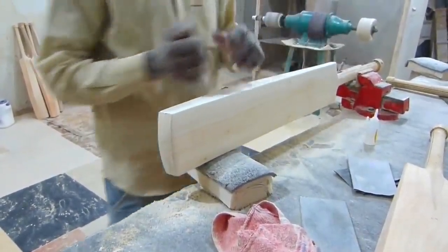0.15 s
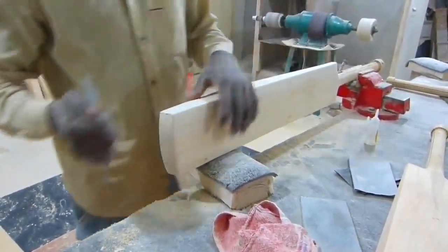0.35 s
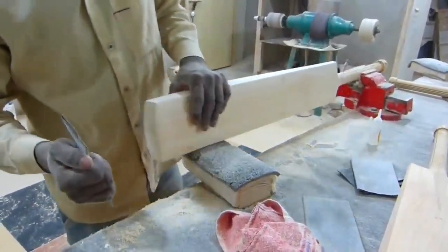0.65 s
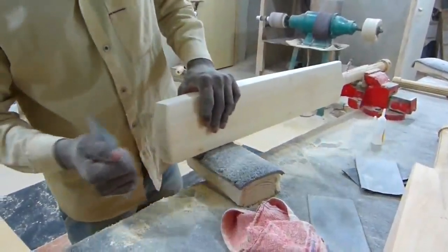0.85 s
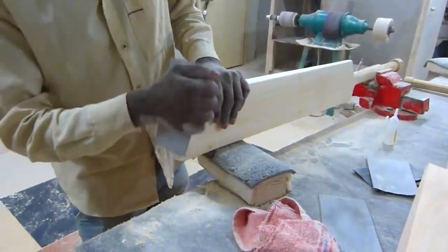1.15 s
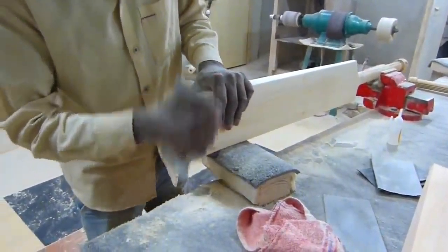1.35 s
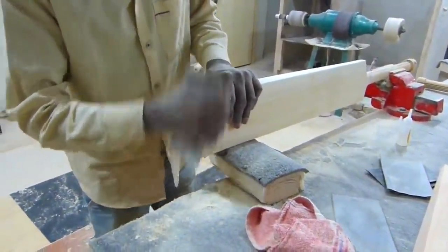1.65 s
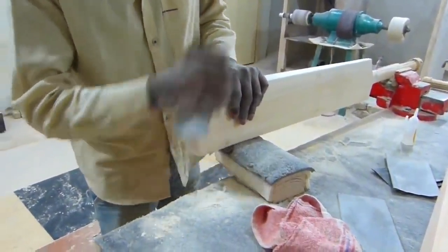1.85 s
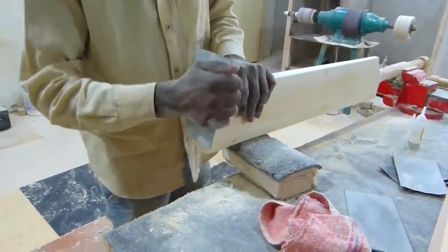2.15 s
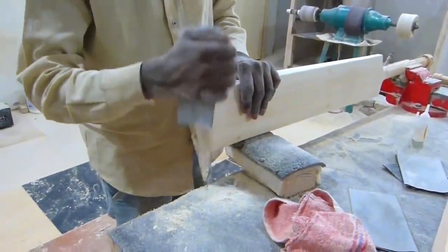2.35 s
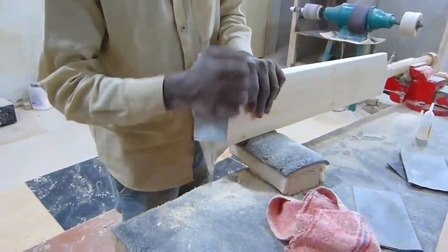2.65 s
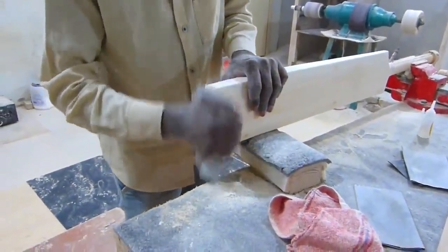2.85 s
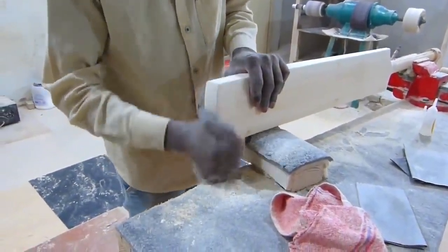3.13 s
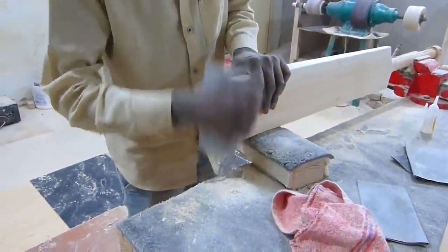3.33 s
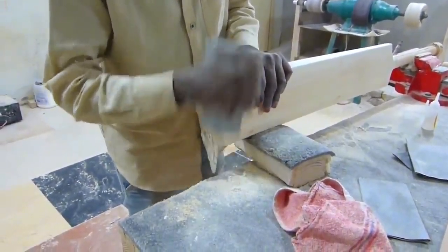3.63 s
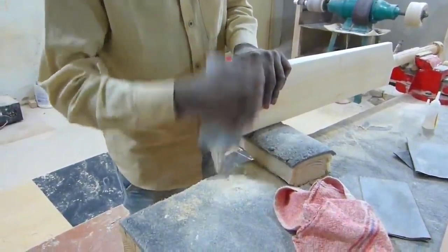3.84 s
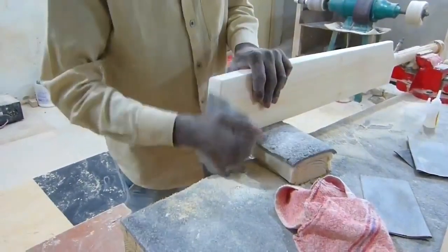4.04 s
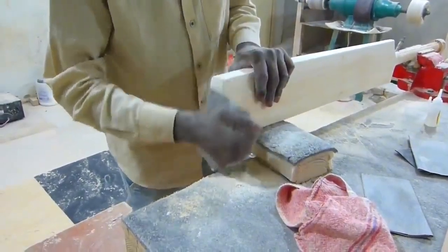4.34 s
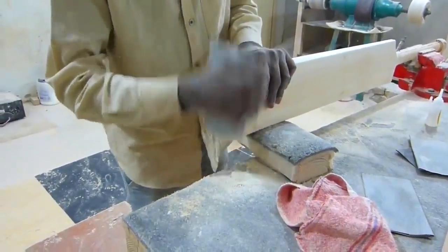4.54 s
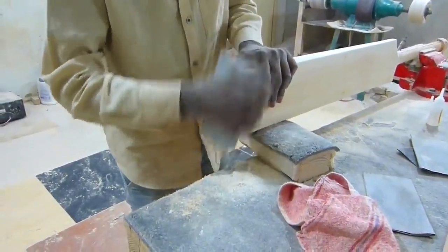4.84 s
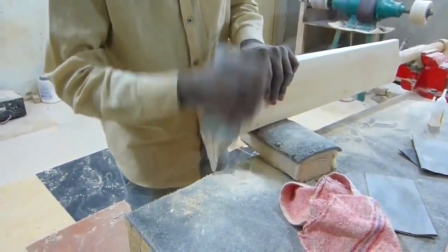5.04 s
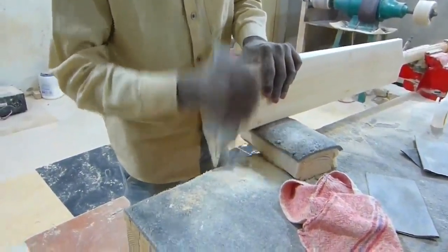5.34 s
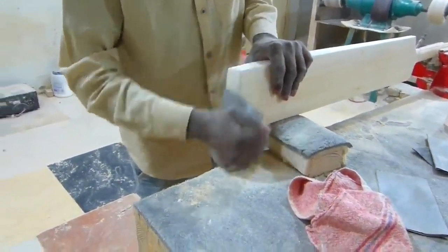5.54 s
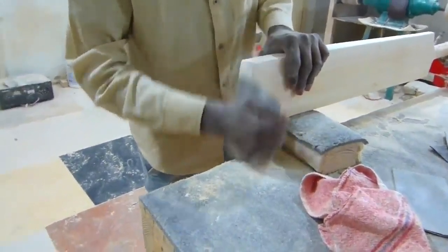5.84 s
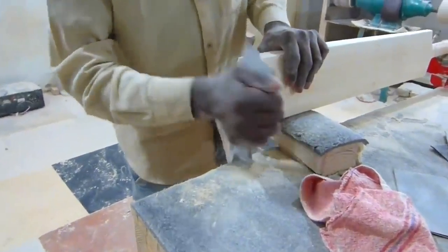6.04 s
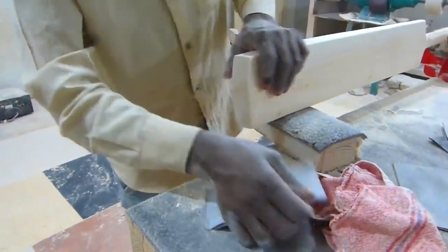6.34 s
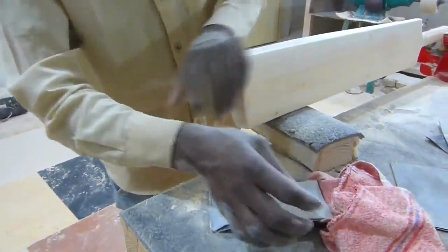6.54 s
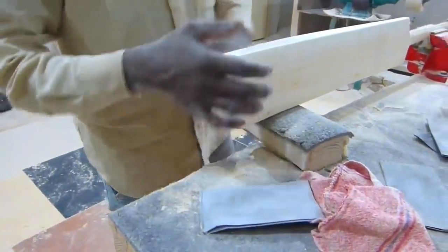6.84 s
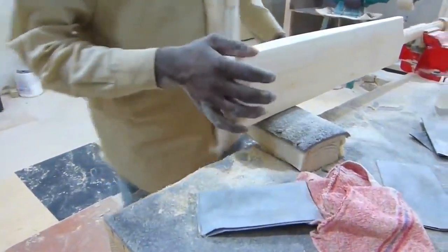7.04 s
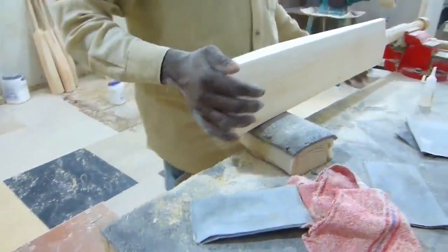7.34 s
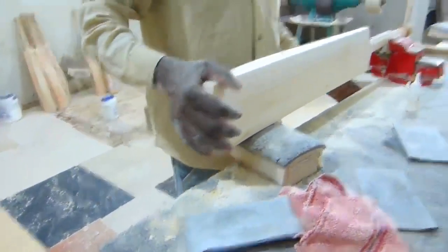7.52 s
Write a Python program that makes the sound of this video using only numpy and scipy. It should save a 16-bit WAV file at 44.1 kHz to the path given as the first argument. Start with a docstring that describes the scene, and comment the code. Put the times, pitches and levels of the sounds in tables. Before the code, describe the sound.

Sandpaper scrapes briskly back and forth over a wooden blade, bright and gritty, with later wooden knocks in a bare room and faint machine hum.

```python
"""Sandpaper is rubbed to and fro, about five strokes a second, over the end of a wooden blade in a bare workshop.
The hiss is a dense crackle of tiny random clicks, louder and brighter as the hand moves faster.
Short sprays of snaps are the paper snagging on the edge; a soft rumble is the wood under the pad.
Wood knocks, most of them late, are noise bursts with ringing tones and an echo of the room.
A machine hums faintly behind, over room noise. The sound cuts in after about half a second of silence."""
import sys
import numpy as np
from scipy import signal
from scipy.fft import rfft, irfft
from scipy.io import wavfile
from scipy.ndimage import uniform_filter1d

SR = 44100
rng = np.random.default_rng(int(sys.argv[2]) if len(sys.argv) > 2 else 0)


def generate_wav(signal):
    """Clip the signal to [-1, 1] and save it as 16-bit WAV at the path in sys.argv[1]."""
    frames = np.transpose(np.atleast_2d(signal))
    scaled = np.clip(frames, -1, 1) * 32767
    pcm = np.round(scaled).astype(np.int16)
    wavfile.write(sys.argv[1], SR, pcm)


N = 338688   # length in samples
TIME = np.arange(N) / SR   # seconds


# Strokes of the hand, with a near-silent pause at 3.82 s; the last row only ends the one before.
# Sheen is the extra treble.
# Columns: turn_s, level_db, sheen_db
HAND_STROKES = [(0.468, -29.5, 4), (0.662, -26, 0), (0.83, -26, 1), (0.958, -28, 2), (1.11, -26, 3),
                (1.27, -27.5, -0.5), (1.43, -27.5, 2), (1.598, -26.5, 0), (1.728, -28, -2),
                (1.869, -28, -3), (2.031, -27.5, -3), (2.166, -27.5, 0), (2.311, -29.5, -2),
                (2.48, -27.5, -0.5), (2.638, -28, 2.5), (2.92, -26.5, 0.5), (3.1, -28.5, 3),
                (3.4, -31, 1.5), (3.582, -28.5, 2), (3.821, -47.5, -9), (3.99, -35, 2), (4.189, -30, 2),
                (4.379, -32, 3.5), (4.585, -33.5, 3.5), (4.786, -33, 6), (5.019, -31, -0.5),
                (5.21, -31.5, 0), (5.423, -29.5, -9), (5.593, -31, 3.5), (5.77, -33, -11), (5.944, -33, -3),
                (6.11, -26.5, -5), (6.33, -33.5, 0.5), (6.508, -28.5, -2), (6.745, -31.5, 3.5),
                (6.92, -27, -3), (7.119, -30, 2), (7.301, -27, 1), (7.49, -32, 0), (7.67, -24.5, 0),
                (7.85, -36, 0)]


def hand_motion(speed_up_s=0.035, slow_down_s=0.065, arc=0.24):
    """The hand gathers speed after a turn and brakes before the next; returns stroke number and speed 0-1."""
    turn_s = np.transpose(HAND_STROKES)[0]
    place = np.interp(TIME, turn_s, np.arange(len(turn_s)))
    stroke = place.astype(int)
    since_s = np.maximum(TIME - turn_s[stroke], 0)
    until_s = turn_s[stroke + 1] - TIME
    # a share `arc` of the speed swells and ebbs over the whole stroke
    swell = 1 - arc + arc * np.sin(np.pi * (place - stroke))
    speed = np.tanh(since_s / speed_up_s) * np.tanh(until_s / slow_down_s) * swell
    return stroke, speed


# Colour of grit on wood.
# Columns: pitch_hz, level_db (per Hz)
GRIT_COLOUR = [(820, -22), (1400, -6), (1520, -5.5), (1870, -4.5), (2270, -3), (2560, -0.5), (2830, 0.5),
               (3630, 3), (8610, 6), (11200, 3.5), (14100, -6.5), (15400, -12.5)]
# Level of the low rasp (full below 3.6 kHz, gone above 5.5 kHz) against the hiss above it.
# Columns: time_s, level_db
RASP_LEVEL = [(0.5, -1.5), (1.5, -1.5), (2.4, 0.5), (3.5, -2), (4.3, -6), (5.0, 3.5), (5.5, -4),
              (6.2, -3.5), (7.68, -3)]


def sanding(stroke, speed, chatter_db=1.06, brighten_db=4.5, wander_db=2.5, grip=0.58,
            wash_db=-2, wash_t60_s=0.48, wash_dull_db=4):
    """Grit tears fibres: a dense crackle that grows louder and brighter with speed."""
    _, peak_db, top_db = np.transpose(HAND_STROKES)
    rasp_db = in_time(RASP_LEVEL)
    force = from_db(peak_db[stroke]) * speed ** grip
    # faster means more grains; the division keeps their overall level even
    crackle = grains(26000 * (speed + .3), size_db=2.1) / np.sqrt(speed + .3)
    hiss = spread(crackle, GRIT_COLOUR)
    hz, whole = np.fft.rfftfreq(N, 1 / SR), rfft(hiss)
    coloured = 0
    centres_hz = np.linspace(1500, 13500, num=22)
    for k, centre in enumerate(centres_hz):
        # each band of the hiss wanders at random in level
        share = np.interp(hz, centres_hz, np.arange(len(centres_hz)) == k)
        rasp = np.interp(centre, [3600, 5500], [1, 0]) * rasp_db
        brightness_db = top_db[stroke] + brighten_db * (speed - .86)
        sheen = np.interp(centre, [8600, 12400], [0, 1]) * brightness_db
        coloured = coloured + irfft(whole * share, N) * from_db(rasp + sheen + wander_db * drift(24))
    rub = coloured * force * from_db(chatter_db * drift(100))
    # a smooth, duller wash of the hiss lingers in the room
    duller = [(f, db - np.interp(f, [7000, 14000], [0, wash_dull_db])) for f, db in GRIT_COLOUR]
    wash = spread(rng.standard_normal((2, N)), duller) * from_db(wash_db)
    return rub + wash * lingering(force, wash_t60_s)


def lingering(gain, t60_s):
    """A room stores sound energy and loses 60 dB in t60_s: the echo level left by a changing gain."""
    keep = from_db(-60 / (t60_s * SR)) ** 2
    return np.sqrt(signal.lfilter([1 - keep], [1, -keep], gain ** 2))


def off_the_blade(x, stroke, speed, path_s=0.0016, bounce=0.073):
    """A reflection whose path follows the hand up and down ripples the spectrum."""
    travel = np.cumsum(speed * (-1.) ** stroke) / SR
    height = rms_one(travel - uniform_filter1d(travel, SR))   # without the slow drift
    heard_s = TIME - path_s * (1 + 0.056 * height)
    reflected = np.array([np.interp(heard_s, TIME, side) for side in x])
    return (x + bounce * reflected) / np.hypot(1, bounce)


# The paper snags on the edge; tilt is the treble gain from one band to the next.
# Columns: start_s, level_db, tilt_db, length_s
EDGE_SNAGS = [(0.588, -19.5, 6, 0.0086), (0.693, -28, -1, 0.02), (0.919, -25, -6, 0.0035),
              (1.2326, -23.5, 1.5, 0.018), (1.2398, -21, 0.5, 0.015), (1.2666, -28.5, -7, 0.022),
              (1.521, -22, 7.5, .006), (2.183, -26, -1, 0.013), (2.408, -21.5, 5.5, .012),
              (2.465, -28.5, -3.5, 0.03), (2.727, -27, 7.5, 0.015), (2.801, -28, -1, 0.011),
              (3.03, -23, 5, .014), (3.358, -24.5, 5.5, 0.0124), (3.467, -27.5, 1.5, 0.019),
              (5.173, -39, -7, 0.0134), (7.17, -24.5, -0.5, 0.0043)]
# The bands that make up each snag.
# Columns: low_hz, high_hz, level_db
SNAG_COLOUR = [(700, 1090, -9.5), (1850, 3180, 1), (4040, 6600, -3.0)]


def snags(room_db=-11.5, room_t60_s=0.52, catch=14.6, catch_s=0.011, rise=0.2, spray=1.22, uneven_db=3.0):
    """The paper catches and lets go in a short spray of snaps, with a little echo."""
    out, t = np.zeros((2, N)), TIME[:SR // 3]
    for start_s, level_db, tilt_db, length_s in EDGE_SNAGS:
        colour = uneven_colour(uneven_db)
        snaps = spread(grains(4500, size_db=2.4, size=len(t)), colour)
        age = t / max(length_s, .002)   # in snag lengths
        echo = spread(rng.standard_normal((2, len(t)))) * from_db(room_db - 60 * t / room_t60_s)
        burst = (spray * snaps * np.exp(-age) + echo) * (1 - np.exp(-age / rise))
        # a brief snag is mostly one snap
        burst[:, np.argmax(age >= rise)] += catch * np.exp(-length_s / catch_s)
        for k, (low, high, band_db) in enumerate(SNAG_COLOUR):
            gain = from_db(level_db + band_db + tilt_db * (k - 1))
            add(out, start_s, even_band(burst, low, high) * gain)
    return out


# How hard the pad bears on the blade, as rumble level before rumble_db and the speed are applied.
# Columns: time_s, level_db
PAD_PRESSURE = [(0.62, -39.5), (1.34, -40), (3.45, -44), (3.66, -56), (4.01, -45.5), (4.44, -59.5),
                (4.6, -46), (5.1, -52.5)]
# Colour of the rumbling blade.
# Columns: pitch_hz, level_db (per Hz)
BLADE_COLOUR = [(53, -41), (90, -27), (118, 6), (158, -2.5), (239, 4), (277, -7.5), (338, 2), (454, -4.5),
                (593, 4.5), (840, -6), (1170, -0.5), (1620, -7.5), (2200, -5.5), (2860, -13), (4840, -120)]


def blade(speed, rumble_db=5.0):
    """The wood gives a soft rumble as hard as the pad bears on it, a little stronger with speed."""
    rumble = spread(grains(9000, size_db=2.0), BLADE_COLOUR)
    return rumble * from_db(in_time(PAD_PRESSURE) + rumble_db) * (0.61 + 0.069 * speed)


# Knocks of wood; tilt is the hardness as gain from one band to the next, ring level is against the blow.
# Columns: start_s, blow_db, tilt_db, ring_hz, ring_db, rattle_s
WOOD_KNOCKS = [(0.592, -38.5, -4, 240.7, 2.5, 0.026), (0.905, -31.5, 3, 655, -7, 0.0044),
               (5.17, -32.5, 4.5, 2900, -3.5, 0.035), (5.226, -33.5, 4.5, 645, -3.5, 0.0077),
               (5.51, -36.5, -12, 322.4, 5, 0.04), (5.636, -42.5, -14.5, 306.6, 0, 0.0036),
               (5.806, -24, 0.5, 880, -3, 0.0045), (5.849, -20, -5, 686, -19, 0.00078),
               (6.012, -17.5, 2.5, 189.5, 3.5, 0.005), (6.03, -26, -8.5, 199.8, 1.5, 0.012),
               (6.315, -28.5, 0.5, 303, -1, .005), (6.342, -24.5, 2, 190, -4, 0.0037),
               (6.371, -13.5, 2, 189, -2, 0.0035), (6.511, -21, -2, 186, -7, 0.0067),
               (6.95, -28, -0.5, 195, -5.5, .003), (7.171, -32.5, -8, 330, -1.5, 0.0056),
               (7.541, -41.5, -7, 209, 2, 0.038)]
# Bands of a knock; echo_t60_s is the time the echo takes to fall 60 dB.
# Columns: low_hz, high_hz, share_of_blow_db, direct_db, echo_db, echo_t60_s
BLOW_BANDS = [(114, 320, -3, -5.5, -9, 1), (335, 770, 2, -6, -10.5, 0.96), (880, 1540, -7.5, 3.5, -7.0, 1),
              (1840, 3400, -9, 1.5, -17.5, 1)]
# Ringing modes of the struck wood, before shared_db and small random changes.
# Columns: pitch_hz, level_db, t60_s
WOOD_MODES = [(130.5, -10.5, 0.89), (319, -18, 0.26), (492, -17, 0.52), (647, 0, 0.062), (803, -14.5, 0.26),
              (886, -4.5, 0.91), (1165, -8, 0.58), (1540, -26, 0.25), (1935, -16, 0.65), (2900, -18, 0.15)]


def knocks(impact=9.0, spread_s=0.0013, soft_s=0.00051, shared_db=-3.0, main_t60_s=0.66, uneven_db=3.5):
    """Each blow is one hard impact and a brief rattle; it sets the wood ringing and fills the hard-walled room."""
    out, t = np.zeros((2, N)), TIME[:SR]
    tops_hz = [row[1] for row in BLOW_BANDS]
    contact = 1 - np.exp(-(t / soft_s) ** 2)
    # the common modes, which every blow excites
    shared_modes = [(hz, db + shared_db, t60_s) for hz, db, t60_s in WOOD_MODES]
    for start_s, blow_db, tilt_db, own_hz, own_db, rattle_s in WOOD_KNOCKS:
        levels_db = [blow_db + row[2] + tilt_db * (k - 1) for k, row in enumerate(BLOW_BANDS)]
        rattle_s = max(rattle_s, .001)
        colour = uneven_colour(uneven_db)
        for (low, high, _, direct_db, echo_db, t60_s), level_db in zip(BLOW_BANDS, levels_db):
            direct = from_db(direct_db) * np.exp(-t / rattle_s) * contact
            echo = from_db(echo_db - 60 * t / t60_s) * (1 - np.exp(-t / spread_s))
            blow = spread(rng.standard_normal((2, len(t))), colour) * (direct + echo)
            # the shorter the rattle, the harder the impact
            blow[:, 0] += 2 * impact * np.exp(-rattle_s / 0.0031)
            add(out, start_s, even_band(blow, low, high, order=3) * from_db(level_db))
        # one more ring depends on where the blow lands
        for hz, db, t60_s in shared_modes + [(own_hz, own_db, main_t60_s)]:
            level_db = db + levels_db[min(np.searchsorted(tops_hz, hz), len(tops_hz) - 1)]
            phase = 2 * np.pi * hz * (1 + 0.0106 * rng.standard_normal()) * t
            # a close neighbour makes each ring waver
            ring = 0.99 * np.sin(phase) + 0.39 * np.sin(1.07 * phase)
            fade = from_db(level_db + rng.normal(0, 1.8) - 60 * t / t60_s)
            add(out, start_s, (ring * contact * fade)[None])
    return band(out, 112, 12000)


# Tones of the machine, before machine_db and the wavering are applied.
# Columns: pitch_hz, level_db
MACHINE_TONES = [(80.7, -59), (107.7, -62), (306.8, -64), (409.1, -62), (651.4, -62), (1314, -64)]
# Colour of the room noise.
# Columns: pitch_hz, level_db (per Hz)
ROOM_COLOUR = [(24, -40), (40, -10), (71, -8), (249, -10), (336, -10.5), (512, -5.5), (1000, -11),
               (1270, -14.5), (1740, -8), (2060, -13), (2200, -13.5), (2860, -18), (4840, -120)]


def workshop(machine_db=-1.5, room_db=-46.5):
    """A far machine hums and wavers over the noise of the room; both come forward before halfway."""
    hum = 0
    for hz, db in MACHINE_TONES:
        tone = np.sin(2 * np.pi * hz * TIME + drift(8))
        waver = from_db(2 * drift(5)) * tone
        hum = hum + np.sqrt(2) * from_db(db + machine_db) * waver
    noise = from_db(room_db) * spread(rng.standard_normal((2, N)), ROOM_COLOUR)
    return (hum + noise) * np.interp(TIME, [2.6, 3.8], [.55, 1])


def from_db(db):
    """Decibels to gain."""
    return 10 ** (np.asarray(db) / 20)


def rms_one(x):
    """Scale to an average strength (rms) of 1."""
    return x / np.sqrt(np.mean(x ** 2) + 1e-20)


def in_time(rows):
    """Read a curve of time_s, value rows at every sample."""
    return np.interp(TIME, *np.transpose(rows))


def at_hz(points, hz):
    """Read a table of pitch_hz, value rows on a log-frequency axis."""
    f, value = np.transpose(points)
    return np.interp(np.log(hz + 1e-3), np.log(f), value)


def band(x, low_hz, high_hz, order=2):
    """Keep only the sound between two frequencies."""
    edges_hz = [low_hz, min(high_hz, SR / 2 - 100)]
    return signal.sosfilt(signal.butter(order, edges_hz, "band", fs=SR, output="sos"), x)


def even_band(x, low_hz, high_hz, order=2):
    """Cut out a band and raise narrow ones, so that white noise keeps about the same level."""
    return band(x, low_hz, high_hz, order) * np.sqrt(SR / 2 / abs(high_hz - low_hz))


def drift(rate):
    """Smooth random wandering, rms 1, with `rate` new targets a second."""
    knots = rng.standard_normal(8192)
    return rms_one(np.interp(TIME * rate, np.arange(len(knots)), knots))


def grains(per_s, size_db, size=N):
    """Two trains of tiny fractures, most small and a few large; rms 1."""
    born = rng.random((2, size)) < per_s / SR
    heights = from_db(size_db * np.minimum(rng.exponential(1, (2, size)), 5))
    return rms_one(born * heights * rng.choice([-1, 1], (2, size)))


def uneven_colour(depth_db):
    """A random uneven colour, drawn anew for each burst: pitch_hz, level_db."""
    hz = np.geomspace(100, 9000, num=70)
    gain = rms_one(from_db(depth_db * rng.standard_normal(len(hz))))
    return np.transpose([np.append(hz, SR / 4), np.append(20 * np.log10(gain), 0)])


# How alike left and right are: 1 is identical, 0 unrelated.
# Columns: pitch_hz, correlation (no unit)
LEFT_RIGHT_LIKENESS = [(100, 1), (500, 0.99), (1000, 0.92), (2000, 0.64), (4000, 0.57), (8000, 0.51),
                       (12000, 0.39)]


def spread(pair, spectrum=None, left_lag_s=2.6e-5):
    """Two unrelated signals become left and right, most alike in the bass; the later left pulls it rightward."""
    size = pair.shape[1]
    hz = np.fft.rfftfreq(size, 1 / SR)
    alike = at_hz(LEFT_RIGHT_LIKENESS, hz)
    colour = 1 if spectrum is None else from_db(at_hz(spectrum, hz))
    mid, side = rfft(pair) * colour
    ports = np.sqrt(1 + alike) * mid + np.sqrt(1 - alike) * side * [[1], [-1]]
    lag = np.exp(-2j * np.pi * hz * left_lag_s * [[1], [0]])
    return rms_one(irfft(ports * lag, size))


def add(out, start_s, sound):
    """Mix a sound in at a time."""
    at = round(start_s * SR)
    out[:, at:at + sound.shape[1]] += sound[:, :N - at]


# The hand moves from side to side: how much louder left is than right.
# Columns: time_s, left_over_right_db
HAND_PAN = [(0.5, -0.1), (2.56, 0.3), (3.68, -1.5), (7.68, -1.5)]


def scene():
    """The sanding close by, the knocks and the machine behind it."""
    stroke, speed = hand_motion()
    paper = off_the_blade(sanding(stroke, speed), stroke, speed) + snags()
    near = (paper + blade(speed)) * from_db(in_time(HAND_PAN) * [[.5], [-.5]])
    knocking = knocks() * from_db([[-.5], [.5]])   # a little to the right
    return near + knocking + workshop()


def record(dry, start_s=0.476, cutoff_hz=15700):
    """Silence until start_s, then an abrupt start; a steep filter removes the top treble."""
    low_pass = signal.ellip(10, .1, 80, cutoff_hz, fs=SR, output="sos")
    return signal.sosfilt(low_pass, dry * (TIME >= start_s))


dry = scene()
out = record(dry)
generate_wav(out)
```